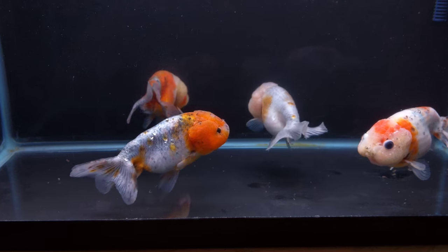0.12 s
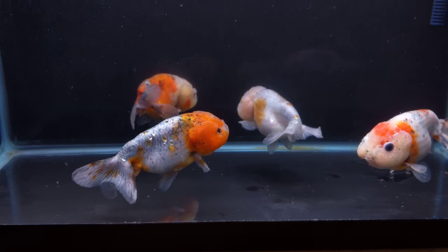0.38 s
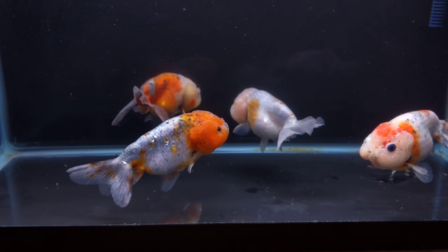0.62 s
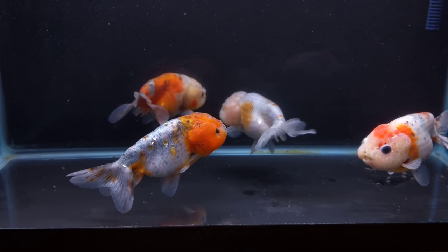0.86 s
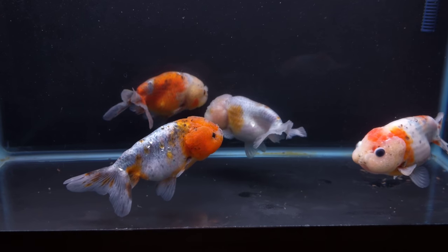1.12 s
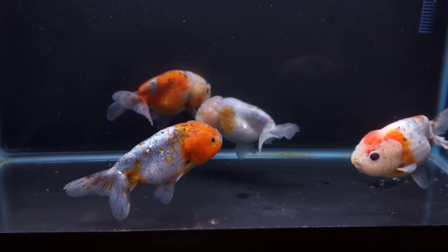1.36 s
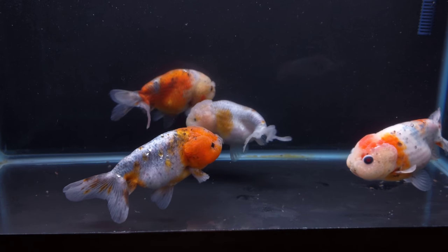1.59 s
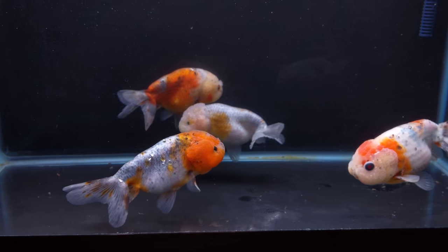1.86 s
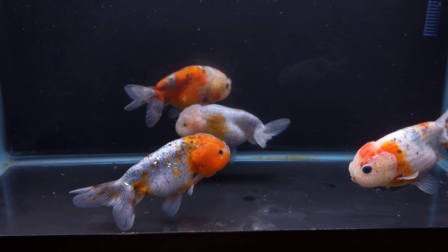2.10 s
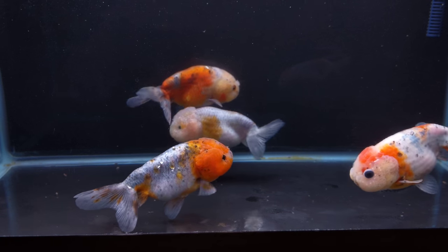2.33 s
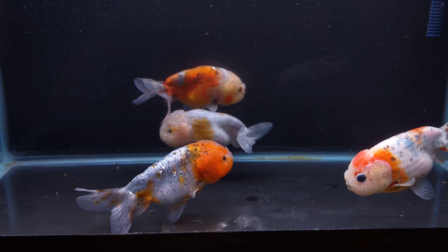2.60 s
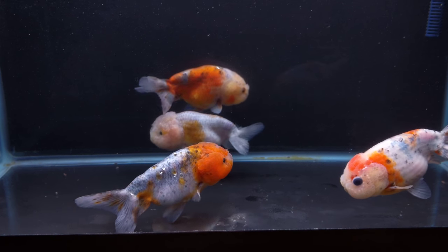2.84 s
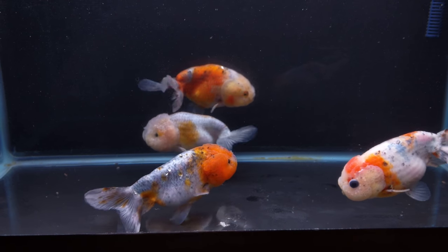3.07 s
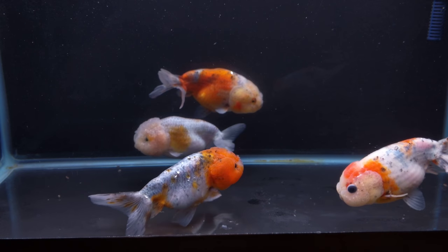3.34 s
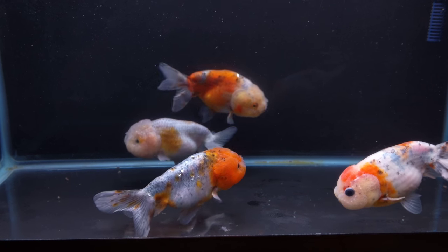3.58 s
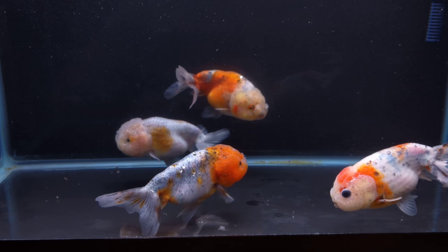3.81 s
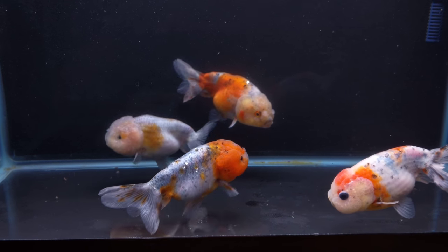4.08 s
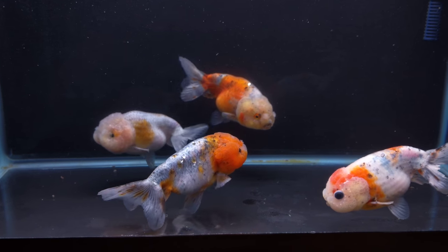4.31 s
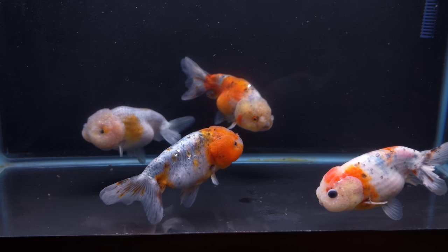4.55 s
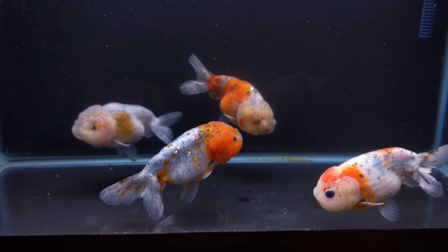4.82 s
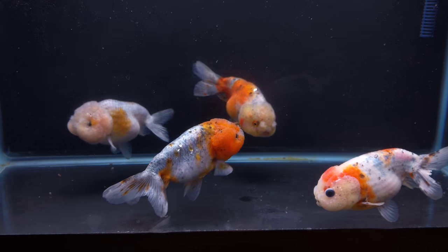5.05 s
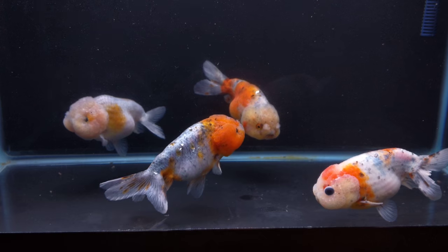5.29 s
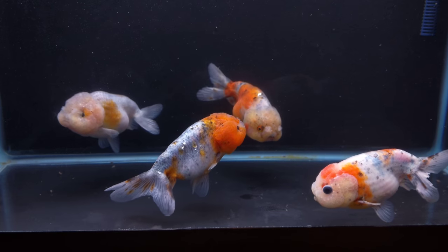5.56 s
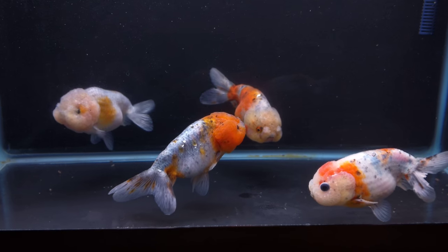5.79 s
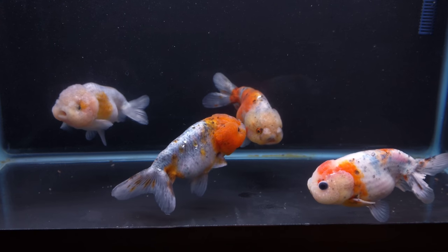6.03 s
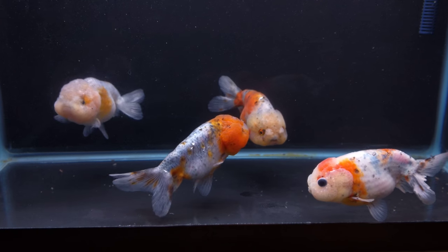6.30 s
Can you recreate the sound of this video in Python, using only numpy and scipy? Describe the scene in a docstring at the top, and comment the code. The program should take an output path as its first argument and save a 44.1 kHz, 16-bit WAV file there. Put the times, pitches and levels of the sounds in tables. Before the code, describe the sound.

A deep, steady mains hum, around 60 Hz with a few low overtones, fills the whole six and a half seconds: an aquarium air pump in a quiet room. It starts slightly stronger with a gentle throb about twice a second, sags a little around 3 s, then recovers. A faint, thin water-pump whine swells and fades beneath it, along with soft water hiss and uneven low building rumble. Tiny bubbles tick faintly throughout. At 1.1 s a soft, dull knock sounds on the stand, followed by light fizzes at 1.2 and 1.6 s. A bright plink comes at 3.1 s, brief spray at 3.4 and 3.8 s, then a run of high and mid plinks from 4.2 to 4.6 s. Another plink at 5.2 s precedes a low, round bloop at 5.4 s and a last small plink near 5.7 s. Rumble swells around 6.2 s as the drone continues to the end.

```python
"""An aquarium air pump hums in a quiet room: tones locked to the mains make one pressure dip per stroke.
A small water pump whines faintly, a sum of tones on one wandering rate.
Plinking bubbles are dying sines, soft knocks ring a few modes, and spray fizzes as puffs of bright noise.
Behind them lie building rumble (noise through resonances) and the hiss of air and water (shaped noise)."""
import sys
import numpy as np
from scipy import signal
from scipy.fft import rfft, irfft
from scipy.io import wavfile
from scipy.ndimage import uniform_filter1d

SR = 44100
rng = np.random.default_rng(int(sys.argv[2]) if len(sys.argv) > 2 else 0)


def magnitude_from_level(level_db):
    """Linear magnitude for a level in decibels (20 dB per decade)."""
    exponent = np.asarray(level_db, float) / 20
    return 10 ** exponent


def transcribe(u):
    """Save the signal u as a 16-bit wav file named by the first command-line argument.

    u: samples, shape (n,) or (channels, n), limited to [-1, 1]; the rate is SR.
    q: integer samples, one column per channel.
    """
    v = np.clip(np.atleast_2d(u).T, -1, 1)
    q = np.round(v * 32767).astype(np.int16)
    wavfile.write(sys.argv[1], SR, q)


N = 282681  # length of the scene (samples)


def rms_one(x):
    """Scale a sound to an rms of 1."""
    return x / np.sqrt(np.mean(x ** 2) + 1e-20)


def in_time(rows):
    """Join table rows by straight lines: one curve per column after the time."""
    s, *columns = np.transpose(rows)
    return [np.interp(np.arange(N) / SR, s, column) for column in columns]


def drift(rate_hz):
    """Slow random wandering of spread 1: smoothed noise, made at one value per 40 samples."""
    r = np.exp(-2 * np.pi * rate_hz * 40 / SR)
    noise = rng.standard_normal(N // 40 + 2002)
    slow = signal.lfilter([1], [1, -2 * r, r * r], noise)[2000:]  # skip the filter's start
    slow = rms_one(slow - slow.mean())
    return np.interp(np.arange(N) / 40, np.arange(len(slow)), slow)


def air_pump():
    """The mains drives each stroke: its low multiples line up in one sharp pressure dip."""
    # multiples of the stroke rate: multiple [count], usual_level_db [dB rms]
    pump_tones = [(2, -49.5), (3, -60), (4, -56), (5, -62.5), (6, -63), (8, -80.5), (9, -85), (10, -77),
                  (11, -75), (13, -89.5), (15, -78.5), (17, -86.5), (18, -80.5), (20, -82.5)]
    # the hum sags and recovers, the throb comes and goes:
    # time_s [s], hum_change_db [dB], throb_tone_db [dB rms]
    hum_sag = [(0, 2, -61), (.7, 0, -50), (1.1, 0.5, -74), (1.55, 0, -53), (2, 1, -68), (2.4, .5, -70),
               (2.6, -1.5, -83), (3.1, -2, -63), (3.6, -2, -60), (4.3, 0, -57), (5.2, -1, -65),
               (5.6, 0.5, -72), (6, 1, -76), (6.41, -0.5, -75)]
    mains_hz = 59.978
    stroke_db = -41  # rms of the stroke rate itself, before the sag
    first_dip_s, lean_rad = .0073, 0.2  # moment of the first pressure dip, and its lean
    magnet_lead_rad = .7  # the magnet pulls twice a cycle, so the second multiple leads
    throb_period_s, throb_peak_s = .468, .64  # period and one of the loudest moments

    t = np.arange(N) / SR
    turn = 2 * np.pi * mains_hz * (t - first_dip_s)
    sag_db, throb_db = in_time(hum_sag)
    out = -magnitude_from_level(stroke_db + sag_db) * np.cos(turn + lean_rad)
    # a faint tone just above the stroke rate beats with it: the hum throbs
    throb_turn = 2 * np.pi * (t - throb_peak_s) / throb_period_s
    out = out - magnitude_from_level(throb_db) * np.cos(turn + lean_rad + throb_turn)
    for k, level_db in pump_tones:
        # high multiples reach the ear by many paths, so their phases are scattered
        scatter = rng.uniform(0, 2 * np.pi) * (k > 6)
        phase = lean_rad + magnet_lead_rad * (round(k) == 2) + scatter
        height = magnitude_from_level(level_db + 0.23 * drift(0.78))
        out = out - height * np.cos(round(k) * turn + phase)
    return np.sqrt(2) * out  # turns rms into sine height


def water_pump():
    """Multiples of one slightly wandering rate; some high ones swell and fade, the rest stay steady."""
    # basic rate of the whine: time_s [s], rate_hz [Hz]
    whine_rate = [(0, 116.52), (2, 116.55), (3.3, 116.5), (4.5, 116.46), (6.41, 116.45)]
    # steady multiples: multiple [count], level_db [dB rms]
    steady_tones = [(1, -75.5), (2, -68.5), (6, -88.5), (7, -82), (9, -83.5), (15, -82.5), (20, -92)]
    # swaying multiples: multiple [count], loudest_db [dB rms, before drift],
    # lost_share [share of height lost when faintest], loudest_s [s]
    swaying_tones = [(14, -71, 0.63, 4.23), (16, -72, 0.74, 3.97), (18, -71, 0.32, 5.3),
                     (19, -75, 0.41, 5.6)]
    sway_period_s = 3.53

    t = np.arange(N) / SR
    turn = 2 * np.pi * np.cumsum(in_time(whine_rate)[0]) / SR
    tones = []
    for k, loudest_db, lost_share, loudest_s in swaying_tones:
        fade = np.sin(np.pi * (t - loudest_s) / sway_period_s) ** 2
        sway = 1 - np.clip(lost_share, 0, 1) * fade
        tones.append((k, magnitude_from_level(loudest_db + 0.99 * drift(2.5)) * sway))
    for k, level_db in steady_tones:
        tones.append((k, magnitude_from_level(level_db)))
    out = 0
    for k, height in tones:
        out = out + height * np.sin(round(k) * turn + rng.uniform(0, 2 * np.pi))
    return np.sqrt(2) * out  # turns rms into sine height


def plink(level_db, hz, decay_s):
    """One surfacing bubble: a dying sine that rises in pitch."""
    t = np.arange(2000) / SR
    envelope = np.exp(-t / decay_s) * np.minimum(t / 0.0008, 1)
    return magnitude_from_level(level_db) * envelope * np.sin(2 * np.pi * hz * t * (1 + 1.3 * t))


def bubbles():
    """The clearest plinks are clusters of four near-equal bubbles, over a scatter of small single ones."""
    # clusters: start_s [s], level_db [dB, each bubble is 8 dB lower], pitch_hz [Hz, about which they spread]
    clear_plinks = [(3.115, -51.5, 3650), (4.245, -51.5, 3250), (4.409, -54, 3270), (4.475, -55, 2050),
                    (4.53, -51.5, 1750), (4.555, -53, 1800), (4.58, -53, 1850), (4.6, -57, 2900),
                    (5.245, -57, 3330), (5.435, -46, 456), (5.47, -49, 660), (5.675, -56, 3350)]
    small_per_s, small_db = 25.0, -70.5  # average rate, and level of the faintest small bubble

    out = np.zeros(N + 2000)  # room for the last tail
    draws = rng.random((600, 3))
    times = np.cumsum(-np.log(1 - draws[:, 0]) / small_per_s)  # random gaps
    rows = []
    for s, u, v in zip(times, draws[:, 1], draws[:, 2]):
        if s < N / SR:
            rows.append((s, small_db + 8 * u, 1500 * 3.5 ** v))
    for s, level_db, hz in clear_plinks:
        for u, v in rng.random((4, 2)):
            rows.append((s + 0.016 * u, level_db - 8, hz * (1 + 0.092 * (v - .5))))
    for s, level_db, hz in rows:
        at = round(s * SR)
        out[at:at + 2000] += plink(level_db, hz, decay_s=0.0079)
    return out[:N]


def fizz():
    """Brief bright puffs of spray: bands of noise, quick to start, slower to die."""
    # puffs: start_s [s], level_db [dB rms of the noise before its envelope],
    # decay_s [s, fall to 37 %], centre_hz [Hz]
    puffs = [(1.19, -62, .04, 8600), (1.61, -66, .03, 9450), (3.441, -65, 0.045, 9750),
             (3.823, -63, .03, 7300), (3.864, -60, 0.031, 8600), (4.603, -68, .04, 10100)]
    t, out = np.arange(N) / SR, 0
    for s, level_db, decay_s, hz in puffs:
        band = signal.butter(3, [hz * .8, hz * 1.18], "band", fs=SR, output="sos")
        noise = rms_one(signal.sosfilt(band, rng.standard_normal(N)))
        envelope = np.clip((t - s) / .008, 0, 1) * np.exp(-np.maximum(t - s, 0) / decay_s)
        out = out + magnitude_from_level(level_db) * envelope * noise
    return out


def ring(clicks, hz, t60_s):
    """A unit click sets a sine of height 1 ringing; it falls by 60 dB in t60_s."""
    r, w = magnitude_from_level(-60 / (t60_s * SR)), 2 * np.pi * hz / SR
    # the tiny offset keeps the filter clear of vanishingly small numbers
    return signal.lfilter([0, np.sin(w)], [1, -2 * r * np.cos(w), r * r], clicks + 1e-18)


def knocks():
    """A soft blow on the stand rings its short modes."""
    # blows: start_s [s], strength_db [dB, lowered by 8 dB to set the click]
    blows = [(1.1038, -37.5), (1.122, -47)]
    # modes of the stand: pitch_hz [Hz], level_db [dB against the click], t60_s [s, fall by 60 dB]
    stand_modes = [(390, -2, .035), (480, -1, .045), (610, -2, .03), (770, -3, .03), (970, -6, .022),
                   (1300, -11, .018)]
    clicks = np.zeros(N)
    for s, strength_db in blows:
        clicks[round(s * SR)] = -magnitude_from_level(strength_db - 8)
    return sum(magnitude_from_level(level_db) * ring(clicks, hz, t60_s) for hz, level_db, t60_s in stand_modes)


def rumble():
    """Noise passed twice through each room resonance, evened, then lifted by bell-shaped swells."""
    # room resonances: pitch_hz [Hz], width_hz [Hz, of one filter pass]
    resonances = [(45, 6), (75, 16), (98, 4)]
    # one entry per resonance: resting_level_db [dB, approximate after evening]
    resting_levels = [-58.5, -57, -61]
    # swells: loudest_s [s], reach_s [s, where the dB lift is down to 37 %],
    # lift_db [dB above rest], resonance_hz [Hz]
    swells = [(0.115, 0.2, 8, 75), (.5, 0.18, 4, 45), (0.898, 0.24, 5, 98), (1.337, 0.21, 6, 98),
              (1.8, 0.19, 4, 75), (2.298, 0.23, 9, 45), (2.534, 0.085, 10, 98), (2.8, .15, 5, 45),
              (2.97, 0.084, 7, 75), (2.973, .08, 9, 98), (3.4, 0.1, 13, 98), (3.44, 0.05, 5, 75),
              (3.9, .3, 1, 45), (4.25, 0.32, 11, 98), (4.744, .12, 8, 98), (5.1, .3, 10.5, 98),
              (6.05, 0.35, 7, 75), (6.251, 0.39, 13.5, 45)]

    t, out = np.arange(N) / SR, 0
    for (hz, width_hz), level_db in zip(resonances, resting_levels):
        b, a = signal.iirpeak(hz, hz / width_hz, SR)
        once = signal.lfilter(b, a, rng.standard_normal(N + SR))
        noise = rms_one(signal.lfilter(b, a, once)[SR:])  # skip the filter's start
        for loudest_s, reach_s, lift_db, near_hz in swells:
            if abs(near_hz - hz) < 10:
                level_db = level_db + lift_db * np.exp(-((t - loudest_s) / reach_s) ** 2)
        power = uniform_filter1d(noise ** 2, size=SR // 4)  # over a quarter second
        out = out + magnitude_from_level(level_db) * noise / np.sqrt(power + .05)
    return out


def coloured(spectrum, patchy_db):
    """Noise of a given spectrum; its half-octave bands flicker, partly in step; rms 1."""
    hz = np.maximum(np.arange(N // 2 + 1) * SR / N, 1)
    points = np.array(spectrum)
    shape_db = np.interp(np.log(hz), np.log(points[:, 0]), points[:, 1], left=-90, right=-90)
    noise = rfft(rng.standard_normal(N)) * magnitude_from_level(shape_db)
    place = 2 * np.log2(hz)  # counts half octaves
    out, together = 0, drift(2.3)
    for k in range(8, 30):
        band = irfft(noise * np.clip(1 - abs(place - k), 0, 1), N)
        out = out + band * magnitude_from_level(patchy_db * (0.43 * together + drift(24.0)))
    return rms_one(out)


def room_air():
    """Room air and motor noise: low-heavy random noise that flickers slightly."""
    # spectrum: pitch_hz [Hz], relative_level_db [dB per Hz]
    air_spectrum = [(20, -43), (35, -24), (44, -5.5), (62, 0.5), (100, -11.5), (112, -9.5), (170, -17),
                    (200, -15), (260, -18.5), (280, -19.5), (470, -22), (520, -28.5), (700, -23.5),
                    (850, -28.5), (1400, -30.5)]
    return magnitude_from_level(-51.5) * coloured(air_spectrum, patchy_db=0.63)


def water_hiss():
    """Water and microphone hiss: brighter random noise that flickers a little more."""
    # spectrum: pitch_hz [Hz], relative_level_db [dB per Hz]
    water_spectrum = [(820, -27), (1400, -3.5), (1560, -1.5), (1990, -2.5), (2210, -4), (2510, -7.5),
                      (3570, -6.5), (5500, -11.5), (7320, -14), (8300, -13.5), (9290, -10), (10500, -19),
                      (11800, -24), (13500, -25.5), (18000, -28)]
    return magnitude_from_level(-61) * coloured(water_spectrum, patchy_db=1.0)


def scene():
    """All sources add up at one microphone."""
    machines = air_pump() + water_pump()
    small_sounds = bubbles() + fizz() + knocks()
    background = rumble() + room_air() + water_hiss()
    return (machines + small_sounds + background)[None]  # one channel


def top_cut(x):
    """Nothing passes above the cut-off."""
    return signal.sosfilt(signal.butter(12, 16960, fs=SR, output="sos"), x)


def record(dry):
    """The mix needs no other treatment before it is stored."""
    return top_cut(dry)


dry = scene()
out = record(dry)
transcribe(out)
```